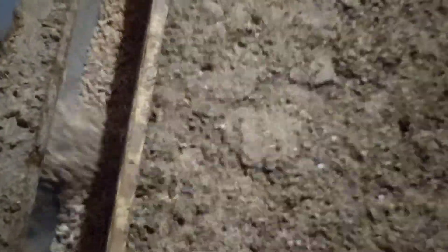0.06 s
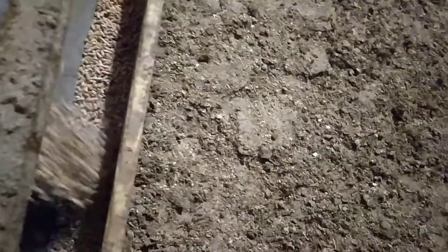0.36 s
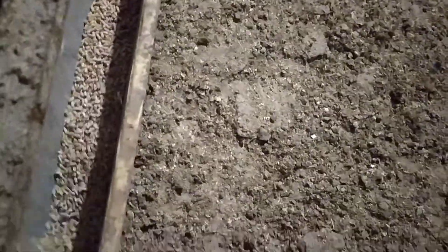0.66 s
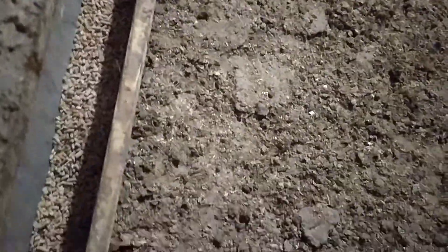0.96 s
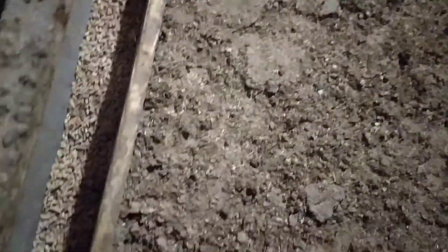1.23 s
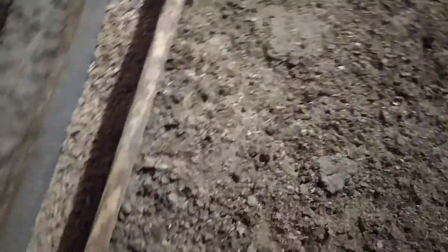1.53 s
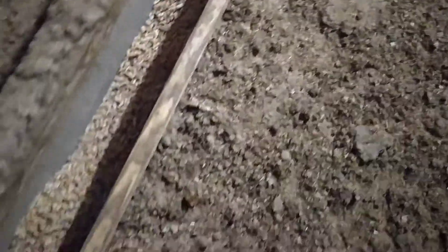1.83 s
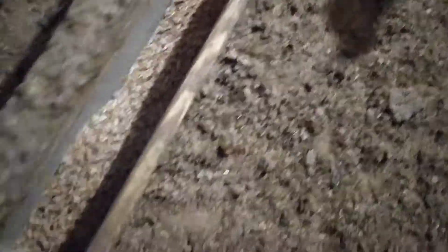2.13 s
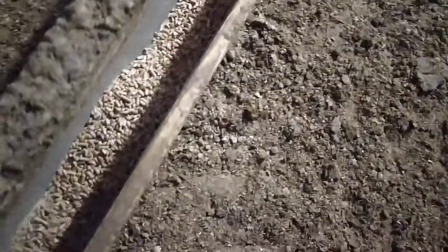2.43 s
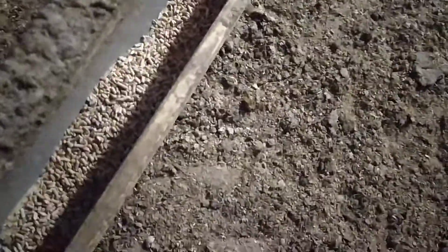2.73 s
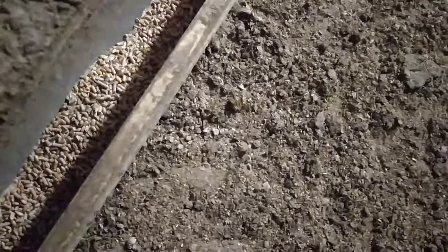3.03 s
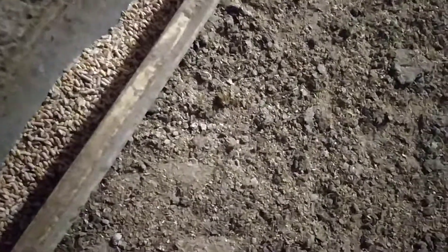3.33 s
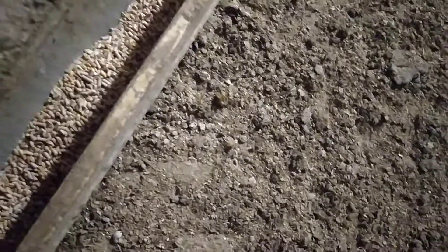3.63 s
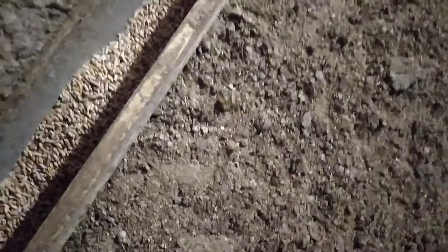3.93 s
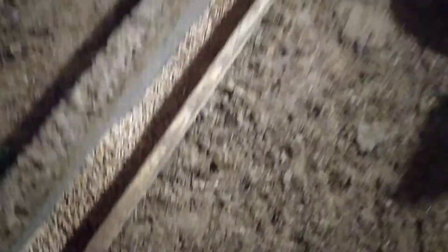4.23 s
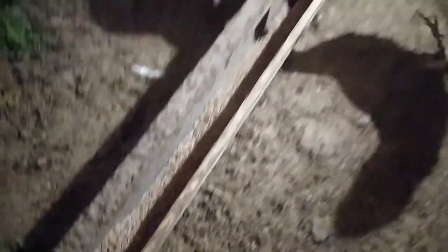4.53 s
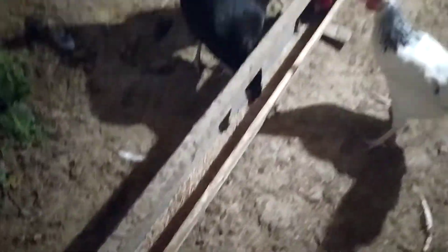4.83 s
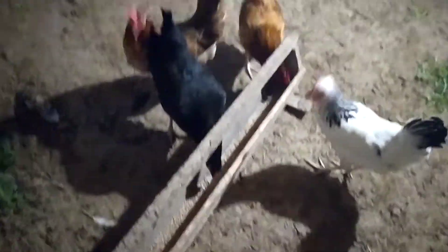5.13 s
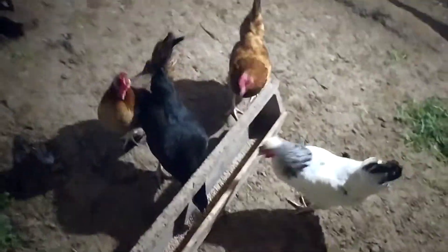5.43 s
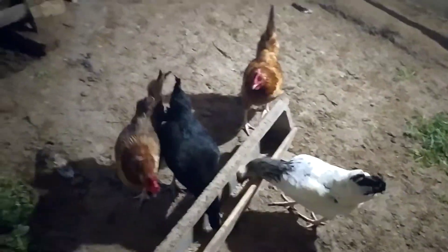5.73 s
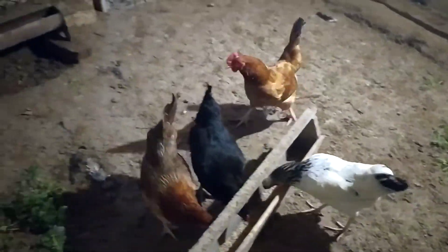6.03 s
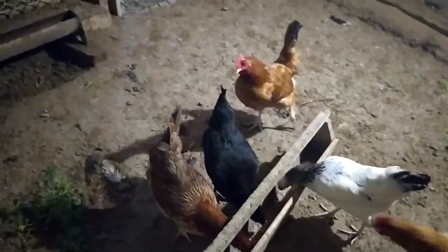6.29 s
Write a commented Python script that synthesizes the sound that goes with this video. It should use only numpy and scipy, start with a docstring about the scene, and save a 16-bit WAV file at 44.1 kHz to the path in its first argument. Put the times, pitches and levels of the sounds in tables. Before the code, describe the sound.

Dry feed is stirred in a booming plastic bucket and settles, giving way to hens shuffling, pecking on wood and quietly clucking.

```python
"""Pellet feed is stirred and shaken in a close plastic bucket: the pellets rattle and slide, and the
wall cracks and booms at every knock. As the feed settles, hens shuffle up to a wooden trough, peck
through the pellets onto its ringing boards and cluck softly.
A low, steady night-time rumble and a faint hiss lie under it all, with one thin, high trill."""
import sys
import numpy as np
from scipy import signal
from scipy.fft import rfft, irfft
from scipy.io import wavfile
from scipy.ndimage import uniform_filter1d

SR = 44100
rng = np.random.default_rng(int(sys.argv[2]) if len(sys.argv) > 2 else 0)


def dump(signal):
    """Clip the signal to [-1, 1] and save it as 16-bit WAV at the path in sys.argv[1]."""
    limited = np.clip(np.atleast_2d(signal).T, -1, 1)
    pcm = np.round(limited * 32767).astype(np.int16)
    wavfile.write(sys.argv[1], SR, pcm)


N = 280464

# EQ of pellets rattling on plastic: (frequency [Hz], relative level [dB])
RATTLE_EQ = [(300, 3), (700, -7), (1000, 1), (1300, 6), (1600, -2.5), (2000, 4), (2500, 0), (2780, -3),
             (3200, 1), (5000, -1), (8300, -6.5), (10500, -16), (15500, -20)]
# EQ of sliding pellets, a thinner hiss: (frequency [Hz], relative level [dB])
SLIDE_EQ = [(500, -22), (1200, -10), (1800, -13), (2750, -9), (3500, 6), (4800, -4), (6600, 0.5),
            (8500, -6), (11000, -14), (15500, -14)]
# EQ of a fine, very high hiss that follows the stir, peaking near 15 kHz:
# (frequency [Hz], relative level [dB])
HIGH_HISS_EQ = [(5000, -13), (10000, 3), (13000, 1), (14800, 7), (16000, 3.5)]
def feed(hard_db=-9, hiss_db=-10, slide_floor=0.081, slide_peak_s=0.33, slide_width_s=0.21):
    """Pellets tumble in a dense scrape, with one long early slide; a gentle stir bares single clicks."""
    slide_swell = np.exp(-((np.arange(N) / SR - slide_peak_s) / slide_width_s) ** 2)
    slide_share = np.clip(slide_floor + (1 - slide_floor) * slide_swell, 0, 1)
    stir_db = automation(STIR_LEVEL)
    clumps = amp(1.3 * drift((2, N), 700))
    tumbling = grains(per_s=7000, spread_db=2.1, cycles=5) * clumps[0]
    clicks = grains(per_s=150, spread_db=4, cycles=0.7) * amp(hard_db + np.clip(STICK_DB - stir_db, 0, 5))
    sliding = colour(grains(per_s=9000, spread_db=1, cycles=4), SLIDE_EQ) * clumps[1]
    scrape = colour(unit_rms(tumbling + clicks), RATTLE_EQ)
    rattle = np.sqrt(1 - slide_share) * scrape + np.sqrt(slide_share) * sliding
    high_hiss = colour(grains(per_s=9000, spread_db=2, cycles=2), HIGH_HISS_EQ)
    high_hiss *= settling() * amp(stir_db + hiss_db)
    rattle = shifting_resonances(rattle)
    rattle_gain, _ = heap_motion()
    return narrow_bass(rattle * rattle_gain + high_hiss)


# How briskly the feed is stirred: (time [s], level [dB])
STIR_LEVEL = [(0.0, -40.5), (0.1, -35), (0.15, -42), (0.25, -28.5), (0.36, -31), (0.42, -36), (0.57, -30.5),
              (0.595, -43), (0.7, -37), (0.765, -38), (0.83, -30), (1.2, -30), (1.71, -37), (2.64, -37),
              (2.72, -47), (3.32, -43), (3.65, -40), (3.81, -56)]
# The heap shifts: (start [s], length [s], rattle level [dB], level of the push on the wall [dB])
HEAP_SURGES = [(0, 0.05, -36, -22), (0.264, 0.073, -23, -14.5), (0.429, 0.056, -26.5, -56),
               (0.672, 0.089, -25.5, -24.5), (0.891, 0.15, -26, -20.5), (1.194, 0.049, -28.5, -28),
               (1.908, 0.11, -32, -27.5), (2.109, 0.12, -32, -27.5), (2.329, 0.2, -26, -21.5),
               (2.981, 0.073, -38.5, -56), (3.2, 0.19, -36.5, -25), (3.428, 0.039, -33.5, -31)]
STICK_DB = -39  # stirred more gently than this, the feed's drumming on the wall falls away faster
def heap_motion(lumps_db=1.5, skew=0.44, sharp=0.55):
    """Envelopes of the rattle and of the push on the wall: a lumpy stir plus each surge of the heap."""
    stir_db = automation(STIR_LEVEL) + lumps_db * drift(N, 1800)
    push_db = -9 + 0.65 * stir_db - 0.51 * np.maximum(STICK_DB - stir_db, 0)
    rattle_surges = swells([(s, length, db) for s, length, db, _ in HEAP_SURGES], skew, sharp)
    push_surges = swells([(s, length, db) for s, length, _, db in HEAP_SURGES], skew, sharp)
    rattle_gain = np.hypot(settling() * amp(stir_db), rattle_surges)
    push_gain = np.hypot(settling() * amp(push_db), push_surges)
    return rattle_gain, push_gain


def settling(rest_s=3.9, db_per_s=67):
    """Fade-out as the bucket comes to rest and the feed settles."""
    return amp(-db_per_s * np.maximum(np.arange(N) / SR - rest_s, 0))


def shifting_resonances(x, depth_db=1.8, size=512):
    """The heap keeps changing shape, so the resonances of its scrape come and go."""
    spectra = signal.stft(x, nperseg=size)[2]
    patches = rng.standard_normal(spectra.shape[1:])
    for _ in range(2):
        patches = uniform_filter1d(patches, size=5, axis=0)  # across frequency
        patches = uniform_filter1d(patches, size=14, axis=1)  # across time
    spectra *= amp(depth_db * unit_rms(patches))
    return unit_rms(signal.istft(spectra, nperseg=size)[1][:, :N])


# Hits on the bucket: (time [s], relative boom level [dB], relative crack level [dB])
BUCKET_KNOCKS = [(0.008, -21.5, -43), (0.092, -18, -49), (0.208, -20, -41), (0.257, -8.5, -24),
                 (0.272, -13.5, -13), (0.282, -9.5, -32), (0.292, -34, -9), (0.603, -52, -24),
                 (0.617, -13, -18.5), (0.636, -18, -13), (0.658, -23.5, -13), (0.664, -13.5, -16),
                 (0.68, -17.5, -35), (0.777, -29, -14.5), (0.827, -14.5, -14), (0.883, -18.5, -38),
                 (0.893, -21, -19), (0.9, -16.5, -15.5), (0.948, -14.5, -21), (0.997, -23, -15.5),
                 (1.019, -17.5, -24), (1.067, -15, -48), (1.208, -22, -25.5), (1.262, -19.5, -55),
                 (1.468, -23.5, -31), (1.508, -17.5, -41), (1.69, -22.5, -45), (1.922, -16.5, -23),
                 (2.066, -16.5, -52), (2.369, -17, -26.5), (2.41, -8, -13.5), (2.433, -7.5, -17),
                 (2.474, -14, -22), (2.769, -28.5, -38), (2.83, -15, -35), (2.912, -21, -33),
                 (2.931, -38, -27), (3.071, -16, -53), (3.198, -10.5, -28.5), (3.241, -8.5, -24),
                 (3.279, -49, -21.5), (3.394, -21, -57), (3.566, -7, -16.5), (3.59, -7.5, -22),
                 (3.678, -22, -37), (3.749, -32, -33), (3.798, -18.5, -34), (3.818, -16, -29),
                 (3.827, -11.5, -25.5)]
def knocks(crack_db=4, spill_db=-7, flex_db=-15, dull_above_db=13, dull_hz=4540):
    """Each knock cracks on the plastic, spills a few pellets and flexes the wall with a dull snap."""
    crack, padded, spill, flex = np.zeros((4, N))
    attack = 1 - decay(fall_s=0.0003)
    for s, low_db, high_db in BUCKET_KNOCKS:
        # the more boom outweighs crack, the more the feed pads the hit and takes its top off
        dull = np.clip((low_db - high_db) / dull_above_db, 0, 1)
        blow = amp(high_db + crack_db) * decay(fall_s=0.0028) * attack
        add(crack, s, np.sqrt(1 - dull) * blow)
        add(padded, s, np.sqrt(dull) * blow)
        add(spill, s, amp(high_db + spill_db) * decay(fall_s=0.01) * attack)
        add(flex, s, amp(low_db + flex_db) * decay(fall_s=0.006) * attack)
    muffled = butter(noise(), 1, dull_hz, "low")
    impacts = crack * noise() + padded * muffled
    spilled = spill * grains(per_s=5500, spread_db=-2, cycles=9.6)
    snap = flex * unit_rms(butter(noise(), 2, [1750, 2400], "band"))
    return narrow_bass(colour(impacts + spilled, RATTLE_EQ) + snap)


# Modes of the bucket's air and plastic wall: (frequency [Hz], relative level [dB], 60 dB decay [s])
BUCKET_MODES = [(65, -23.5, 0.2), (96, -12, 0.086), (137, -5.5, 0.18), (203, -13.5, 0.089),
                (264.3, -15, 0.14), (340, -16.5, 0.027), (400.8, -5.5, 0.076), (447, -4, 0.092),
                (499.4, -4, 0.034), (536.2, -11.5, 0.1), (765, -15.5, 0.054), (1730, -20, 0.037)]
def bucket_body(drum_db=-2, boom_db=2, damping=0.72, light_db=-3, spot_count=9, slip_gap_s=0.018):
    """The low end: the bucket drums as the feed slips against it, and booms at each knock."""
    _, push = heap_motion()
    body = np.zeros(N)
    # feed pressing on the wall chokes its ring, and light bumps stir the deep modes less
    damped = [(hz, db + light_db * (hz < 200), t60 * damping) for hz, db, t60 in BUCKET_MODES]
    spots = [ring(damped, detune=0.09, uneven_db=3.5) for _ in range(spot_count)]
    gaps, strengths = rng.standard_normal((600, 2)).T
    slip_times = np.cumsum(slip_gap_s * np.exp(0.55 * gaps)) - slip_gap_s / 2
    for s, strength, spot in zip(slip_times, strengths, rng.integers(0, spot_count, len(gaps))):
        if 0 <= s * SR < N:
            weight = amp(drum_db + 3 * np.clip(strength, -2, 1.2)) * np.sqrt(slip_gap_s * SR)
            bump = spots[spot] / np.linalg.norm(spots[spot])
            add(body, s, push[int(s * SR)] * weight * bump)
    for s, low_db, _ in BUCKET_KNOCKS:
        add(body, s, amp(low_db + boom_db) * ring(BUCKET_MODES, detune=0.04, uneven_db=2))
    return np.array([body, body])


# Stray pellets on the bucket's rim: (time [s], level [dB])
RIM_HITS = [(0.412, -26), (0.637, -16), (0.777, -19), (1.131, -17), (3.719, -28)]
def rim_ticks(low_cut_hz=4000):
    """A lone pellet on the hard rim gives one bright click."""
    envelope = np.zeros(N)
    for s, db in RIM_HITS:
        add(envelope, s, amp(db) * decay(fall_s=0.0012))
    return narrow_bass(butter(envelope * noise(), 2, low_cut_hz, "high"))


# Beak hits: (time [s], relative wood level [dB], relative crunch level [dB], pitch of the spot [Hz])
TROUGH_PECKS = [(2.994, -34.5, -50, 970), (3.993, -26.5, -35.5, 734), (4.091, -32, -43, 807),
                (4.233, -27, -43.5, 583), (4.405, -38, -60, 837), (4.452, -30, -59, 927),
                (4.463, -26.5, -46, 748), (4.512, -36.5, -55, 490), (4.785, -29.5, -38, 643),
                (4.8, -35, -41.5, 782), (5.078, -28.5, -40, 656), (5.317, -27, -42.5, 574),
                (5.577, -23.5, -31, 608), (5.595, -47, -37, 624), (5.82, -24, -34.5, 649),
                (5.974, -35.5, -46.5, 750), (6.212, -24, -43, 684)]
# Modes of the trough's boards: (frequency [x the spot's pitch], relative level [dB], 60 dB decay [s])
TROUGH_MODES = [(0.5, -15.5, 0.02), (0.87, -10, 0.055), (1, -4, 0.075), (1.18, -6.5, 0.043),
                (1.45, -9, 0.02), (1.95, -11, 0.032)]
# EQ of a beak among pellets: (frequency [Hz], relative level [dB])
CRUNCH_EQ = [(400, 2.5), (700, -22), (2200, -59), (3700, 7), (5200, -3), (7000, 7), (8600, 9.5), (10500, 1),
             (15500, -1.5)]
# EQ of the wood's dry clack: (frequency [Hz], relative level [dB])
CLACK_EQ = [(300, -13), (750, 6.5), (1000, -5.5), (1250, 5), (2300, -1), (3600, 5), (5000, -14),
            (15000, -48)]
def pecks(wood_db=4, clack_db=-10, crunch_db=-3, tick_db=-1, plough_s=0.0088, bite_s=0.0013):
    """A beak ticks on a pellet, ploughs briefly into the feed and strikes the board beneath."""
    wood, clack, tick, crunch = np.zeros((4, N))
    for s, low_db, high_db, spot_hz in TROUGH_PECKS:
        board = ring(board_modes(spot_hz), detune=0.015, uneven_db=1.5, contact_s=0.0008)
        add(wood, s, amp(low_db + wood_db) * board)
        add(clack, s, amp(low_db + clack_db) * decay(fall_s=0.014))
        add(tick, s, amp(high_db + tick_db) * decay(fall_s=0.0025))
        add(crunch, s, amp(high_db + crunch_db) * decay(plough_s) * (1 - decay(bite_s)))
    pellets = tick * noise() + crunch * grains(per_s=2000, spread_db=2, cycles=3)
    return wood + narrow_bass(colour(pellets, CRUNCH_EQ) + colour(clack * noise(), CLACK_EQ))


def board_modes(spot_hz):
    """Each spot on the trough rings at its own pitch: all modes scale with the pitch of the spot struck."""
    return [(multiple * spot_hz, db, t60) for multiple, db, t60 in TROUGH_MODES]


# Pellets breaking in a beak: (time [s], relative level [dB])
PELLET_SNAPS = [(5.316, -38.5), (5.599, -28), (5.862, -37.5), (6.048, -37.5), (6.2104, -28.5)]
def pellet_snaps(fall_s=0.00083):
    """A pellet breaks with one very short, bright click."""
    envelope = np.zeros(N)
    for s, db in PELLET_SNAPS:
        add(envelope, s, amp(db) * decay(fall_s))
    return narrow_bass(colour(envelope * rng.choice([-2, 2], (2, N)), CRUNCH_EQ))


# Soft clucks: (start [s], length [s], start pitch [Hz], end pitch [Hz], level [dB], rasp [0-1])
CLUCK_NOTES = [(4.556, 0.032, 863, 970, -52, 0), (5.008, 0.048, 802, 696, -41.5, 0.7),
               (5.051, 0.048, 765, 520, -41, 0.24), (5.492, 0.015, 484, 460, -40, 0.04),
               (5.613, 0.065, 632, 560, -49, 0), (5.715, 0.032, 518, 450, -40, 0),
               (6.018, 0.025, 543, 466, -41, 0.01), (6.098, 0.022, 1160, 990, -53, 0.1),
               (6.139, 0.075, 494, 521, -33.5, 0), (6.322, 0.062, 738, 674, -43, 0.03)]
# EQ of a hen's throat in a rasp: (frequency [Hz], relative level [dB])
THROAT_EQ = [(400, -18), (750, -20), (1000, -1), (1380, 4), (1700, 3), (2200, -15), (3300, -6), (3800, 6),
             (4500, -51)]
def clucks(octave_db=-21):
    """Short, nearly pure notes that swell fast and die away; in a rasp, rough puffs sound the throat."""
    tone, puffs = np.zeros((2, N))
    for s, length, start_hz, end_hz, db, rasp in CLUCK_NOTES:
        progress = np.linspace(0, 1, round(length * SR))
        waver, flutter = drift((2, SR), 110)[:, :len(progress)]
        hz = (start_hz + (end_hz - start_hz) * progress) * (1 + 0.025 * waver)
        phase = 2 * np.pi * np.cumsum(hz) / SR
        envelope = amp(db) * arch(progress, skew=0.7, sharp=1.8) * (1 + 0.25 * flutter)
        note = unit_rms(np.sin(phase) + amp(octave_db) * np.sin(2 * phase))
        pulses = unit_rms((1 + np.cos(phase / 2)) ** 2)  # one puff every second cycle
        add(tone, s, envelope * np.sqrt(1 - rasp) * note)
        add(puffs, s, envelope * np.sqrt(rasp) * pulses)
    return tone + colour(puffs * rng.standard_normal((1, N)), THROAT_EQ)


# Feet and feathers on bare earth: (start [s], length [s], relative level [dB])
SCUFF_MOVES = [(3.9, 0.11, -41), (4.205, 0.15, -39.5), (4.43, 0.14, -38.5), (4.585, 0.13, -39.5),
               (4.95, 0.21, -42), (5.205, 0.052, -40.5), (5.39, 0.063, -41.5), (5.705, 0.034, -44)]
# EQ of a scuff: (frequency [Hz], relative level [dB])
SCUFF_EQ = [(50, -12), (170, 8.5), (520, 7.5), (800, 1.5), (1100, -6), (1500, -13.5), (3700, -10.5),
            (6000, -18), (14000, -35)]
def shuffle(scuff_db=-3, taps_db=4, fidget_db=-48, tap_count=110):
    """Feet scuff the dry earth in fits and starts; claws and beaks tap lightly on the boards."""
    moves = swells(SCUFF_MOVES, skew=0.79, sharp=0.58)
    activity = np.hypot(amp(fidget_db), moves)  # the flock is never quite still
    fits_db = 3 * drift(N, 900)
    scuffs = narrow_bass(colour(grains(per_s=3300, spread_db=2.5, cycles=0.55), SCUFF_EQ))
    taps = np.zeros(N)
    for when, spot, strength in rng.random((tap_count, 3)):
        tap = ring(board_modes(spot_hz=330 * 3 ** spot), detune=0.02, uneven_db=3)
        add(taps, when * N / SR, amp(taps_db) * (0.5 + 2 * strength) * tap)
    return activity * (scuffs * amp(fits_db + scuff_db) + taps)


# EQ of the trill: (frequency [Hz], relative level [dB])
TRILL_EQ = [(7500, -12), (9200, -2), (9900, -5), (10600, -41)]
def trill(start_s=4.28, length_s=0.89, level_db=-51):
    """A narrow, high hiss that swells and stops, perhaps a distant bush cricket."""
    return colour(noise(), TRILL_EQ) * swells([(start_s, length_s, level_db)], skew=1, sharp=0.6)


# EQ of the night air: (frequency [Hz], relative level [dB])
NIGHT_EQ = [(20, -10), (55, 22.5), (170, 14.5), (550, 5), (1000, 8.5), (2000, 2.5), (5000, -2.5),
            (6500, 6.5), (8900, 6), (11000, -6), (15500, -4)]
def night_air(level_db=-50):
    """The bed: a steady low rumble with a soft hiss on top."""
    return amp(level_db) * narrow_bass(colour(noise(), NIGHT_EQ))


def yard(x, wet_db, t60=0.21, predelay_s=0.005, echoes_per_s=2000, size=14000):
    """Adds weak, short reflections from the ground and the nearby walls."""
    t = np.arange(size) / SR
    echoes = rng.standard_normal((2, size)) * (rng.random((2, size)) < echoes_per_s / SR)
    echoes *= amp(-60 * t / t60) * (t > predelay_s)
    echoes /= np.linalg.norm(echoes, axis=1, keepdims=True)
    return x + amp(wet_db) * narrow_bass(signal.oaconvolve(x, echoes, axes=1)[:, :N])


# How alike left and right are: (frequency [Hz], correlation [0-1])
STEREO_LIKENESS = [(60, 0.7), (300, 0.86), (700, 0.31), (1400, 0.72), (3000, 0.15), (15000, 0.014)]
def narrow_bass(pair):
    """Two unrelated channels become alike in the bass, as at two close microphones."""
    left, right = rfft(pair)
    same = np.clip(curve_at(STEREO_LIKENESS, np.fft.rfftfreq(N, 1 / SR)), 0, 1)
    return irfft([left, same * left + np.sqrt(1 - same ** 2) * right], N)


def pan(pair, balance, lag_s):
    """Shades one side against the other by frequency and delays the left channel."""
    hz = np.fft.rfftfreq(N, 1 / SR)
    tilt = amp(curve_at(balance, hz) / 2)
    delay = np.exp(-2j * np.pi * hz * lag_s)
    return irfft(rfft(pair) * [tilt * delay, 1 / tilt], N)


def grains(per_s, spread_db, cycles, size=176):
    """Tiny collisions of uneven size; each rings briefly at its own pitch, unevenly left and right."""
    starts = np.flatnonzero(rng.random(N) < per_s / SR)
    chance = rng.random((6, N))[:, starts, None]
    hz = 500 + 15500 * chance[0] ** 1.5
    weight = amp(spread_db * np.minimum(-np.log(chance[1]), 4)) * hz ** (2 / 3)
    t = np.arange(size) / SR
    envelope = weight * np.exp(-t * hz / cycles) * (1 - np.arange(size) / size)
    samples = (starts[:, None] + np.arange(size)).ravel()
    channels = []
    for nearness, phase in zip(chance[2:4], chance[4:6]):
        pings = (0.5 + nearness) * envelope * np.sin(2 * np.pi * (hz * t + phase))
        channels.append(np.bincount(samples, pings.ravel(), N + size)[:N])
    return unit_rms(np.array(channels))


def ring(modes, detune, uneven_db, contact_s=0.003, size=13000):
    """One blow on a body; where it lands sets the weight and exact pitch of each mode."""
    hz, db, t60 = np.transpose(modes)[:, :, None]
    pitch, weight = rng.standard_normal((2, len(modes), 1))
    t = np.arange(size) / SR
    envelopes = amp(db + uneven_db * weight - 60 * t / t60)
    partials = envelopes * np.sin(2 * np.pi * hz * (1 + detune * pitch) * t)
    return partials.sum(0) * (1 - decay(contact_s, size))


def swells(rows, skew, sharp):
    """Envelope with one arch for each (start [s], length [s], level [dB])."""
    gain = np.zeros(N)
    for s, length, db in rows:
        add(gain, s, amp(db) * arch(np.linspace(0, 1, round(length * SR)), skew, sharp))
    return gain


def arch(progress, skew, sharp):
    """A rise and fall; skew under 1 brings the peak forward, more sharp narrows it."""
    return np.sin(np.pi * progress ** skew).clip(0) ** sharp


def decay(fall_s, size=6000):
    """Instant attack, exponential tail."""
    return np.exp(-np.arange(size) / SR / fall_s)


def colour(x, eq, size=2048):
    """Causal filter of unit energy with the given EQ curve."""
    log_gain = np.log(amp(curve_at(eq, abs(np.fft.fftfreq(size, 1 / SR)))))
    taps = np.fft.ifft(np.exp(signal.hilbert(log_gain).conj())).real
    return signal.oaconvolve(x, taps[None] / np.linalg.norm(taps), axes=1)[:, :N]


def butter(x, order, hz, kind):
    """Low-, high- or band-pass filter."""
    return signal.sosfilt(signal.butter(order, hz, kind, fs=SR, output="sos"), x)


def curve_at(points, hz):
    """Reads a curve on a log-frequency axis."""
    point_hz, values = np.transpose(points)
    return np.interp(np.log(hz + 1), np.log(point_hz + 1), values)


def automation(points):
    """A (time, level) curve at every sample."""
    return np.interp(np.arange(N) / SR, *np.transpose(points))


def noise():
    """Stereo white noise."""
    return rng.standard_normal((2, N))


def drift(shape, smooth_samples):
    """Smoothed random modulation of rms 1."""
    return unit_rms(uniform_filter1d(rng.standard_normal(shape), smooth_samples))


def add(mix, s, sound):
    """Mixes a sound in at time s."""
    part = mix[..., max(0, round(s * SR)):][..., :sound.shape[-1]]
    part += sound[..., :part.shape[-1]]


def amp(db):
    """Decibels to gain."""
    return 10 ** (np.asarray(db) / 20)


def unit_rms(x):
    """Scales to rms 1."""
    return x / np.sqrt(np.mean(x ** 2) + 1e-20)


# Stereo balance of the bucket: (frequency [Hz], left minus right [dB])
BUCKET_BALANCE = [(60, -2), (200, 0), (400, -2.5), (700, -1), (1300, 0.5), (2400, 1.5), (4400, 5.5),
                  (8000, 4.5), (15000, 0)]
# Stereo balance of the hens: (frequency [Hz], left minus right [dB])
HENS_BALANCE = [(100, 0.5), (700, 1), (1500, 3), (4000, 8), (8000, 26.5), (15000, 10)]
def scene():
    """The bucket is close on the right, its broad wall nearer the middle; the hens are ahead."""
    pellets = yard(feed() + knocks() + rim_ticks(), wet_db=-11)
    pellets = pan(pellets, BUCKET_BALANCE, lag_s=0.000381)
    body = pan(yard(bucket_body(), wet_db=-15), BUCKET_BALANCE, lag_s=0.0003)
    hens = yard(pecks() + pellet_snaps() + clucks() + shuffle(), wet_db=-7.5)
    hens = pan(hens, HENS_BALANCE, lag_s=0.00007)
    return pellets + body + hens + night_air() + trill()


def record(dry, low_cut_hz=48, high_cut_hz=16000):
    """The microphone sheds the deepest bass and rounds the highest peaks; a steep high cut follows."""
    rounded = np.tanh(butter(dry, 3, low_cut_hz, "high"))
    high_cut = signal.firwin(601, high_cut_hz, window=("kaiser", 8), fs=SR)
    return signal.oaconvolve(rounded, high_cut[None], "same")


dry = scene()
out = record(dry)
dump(out)
```